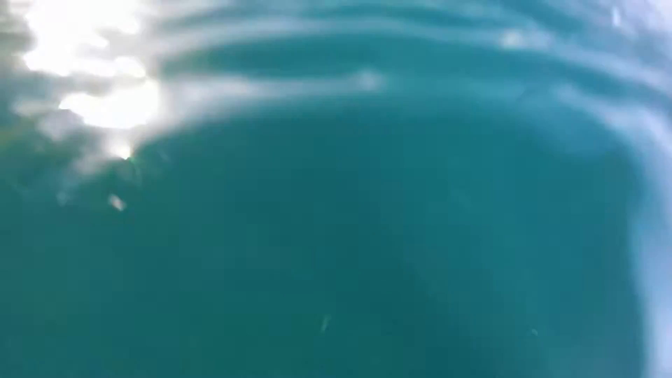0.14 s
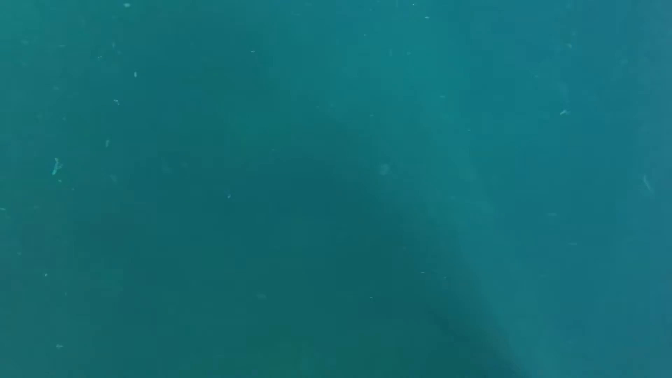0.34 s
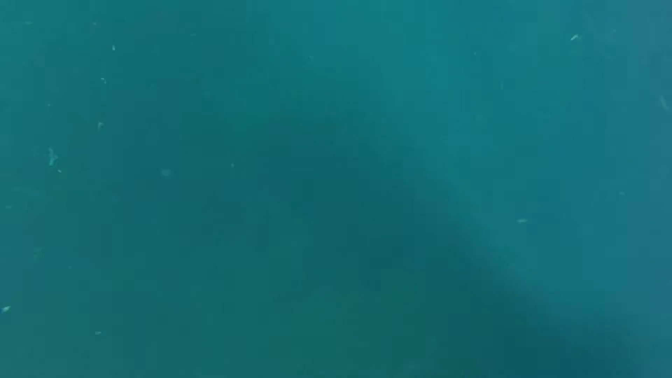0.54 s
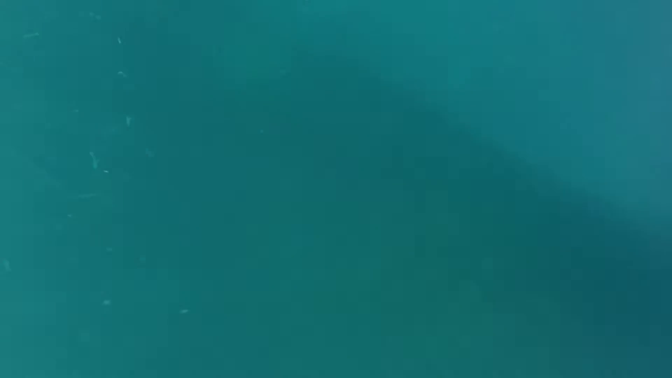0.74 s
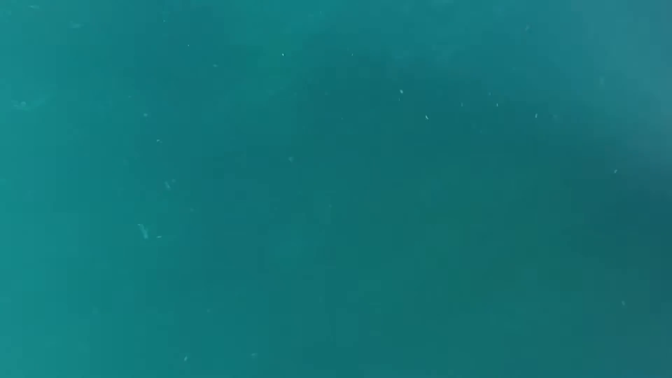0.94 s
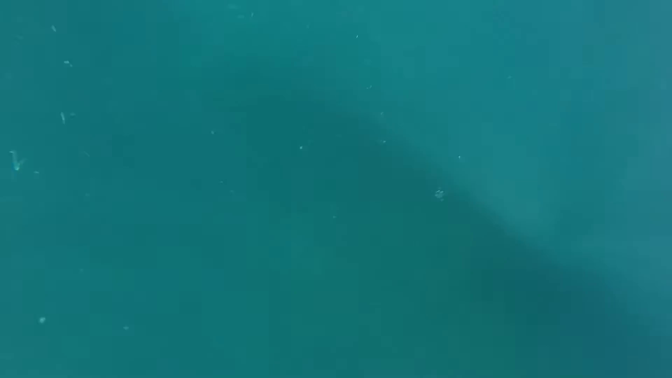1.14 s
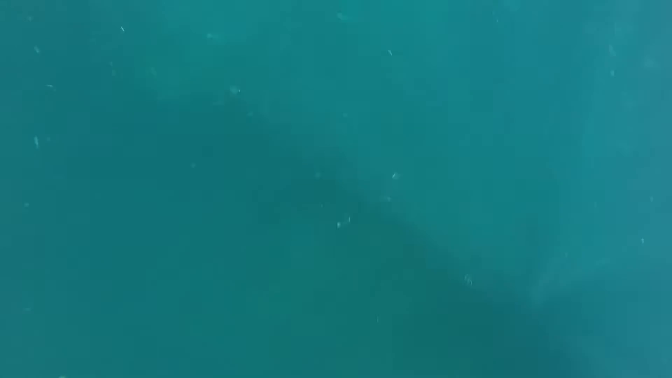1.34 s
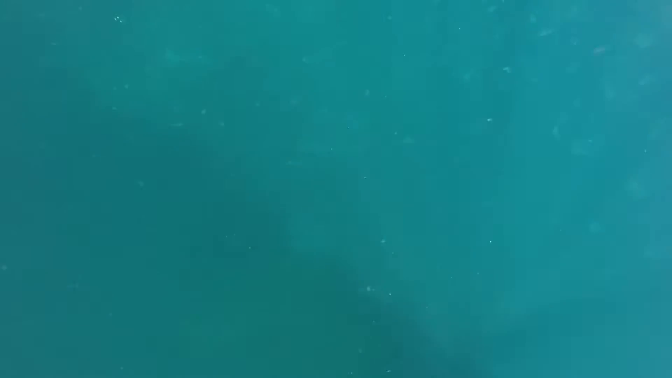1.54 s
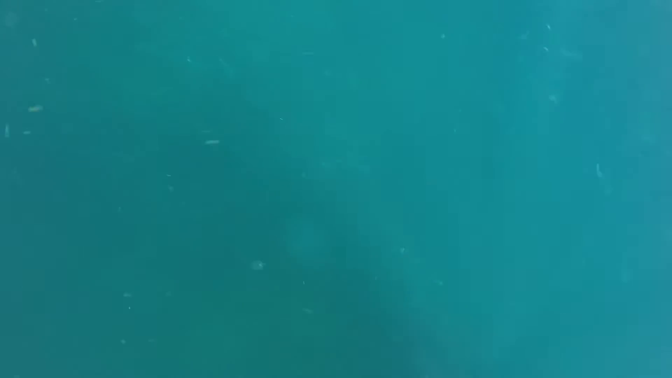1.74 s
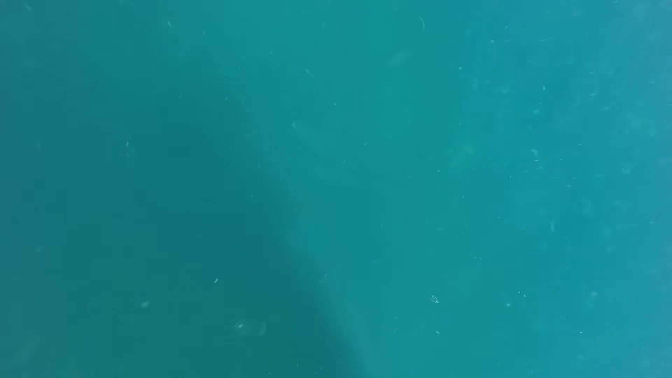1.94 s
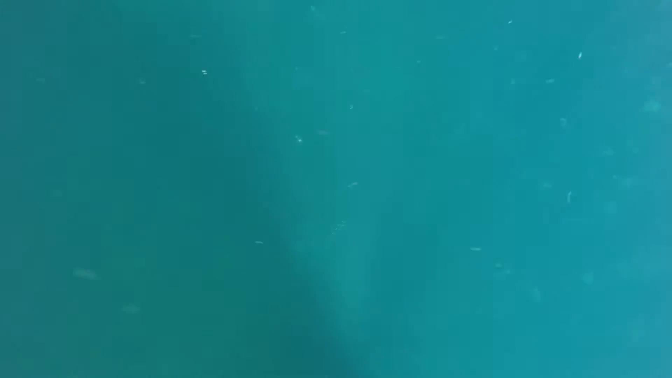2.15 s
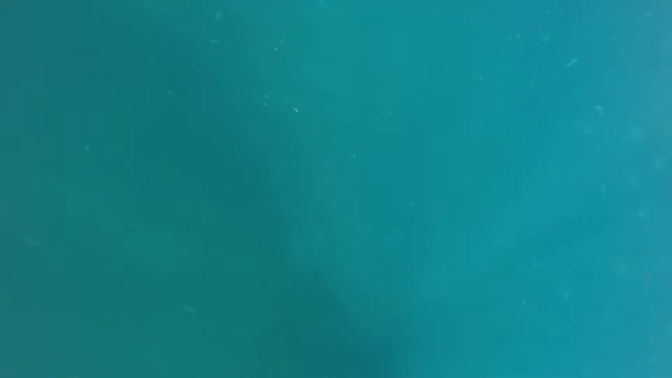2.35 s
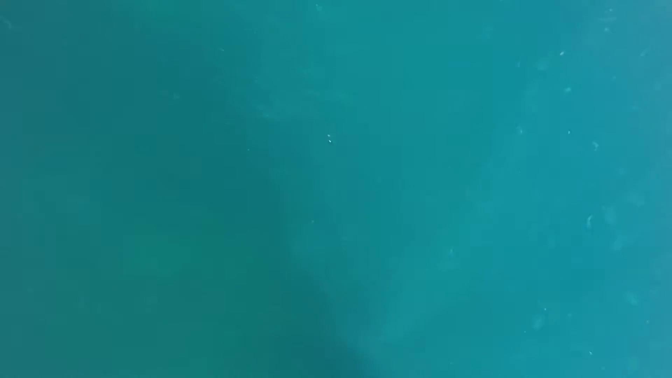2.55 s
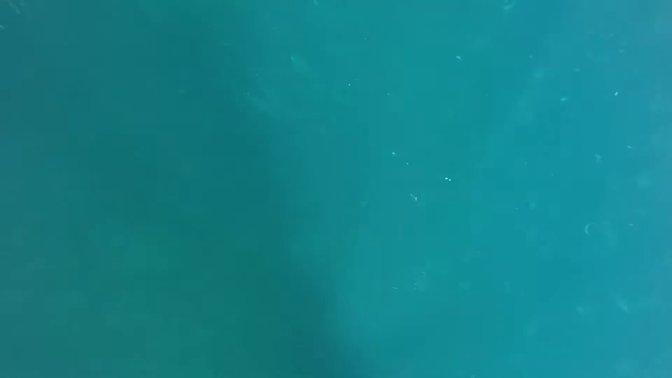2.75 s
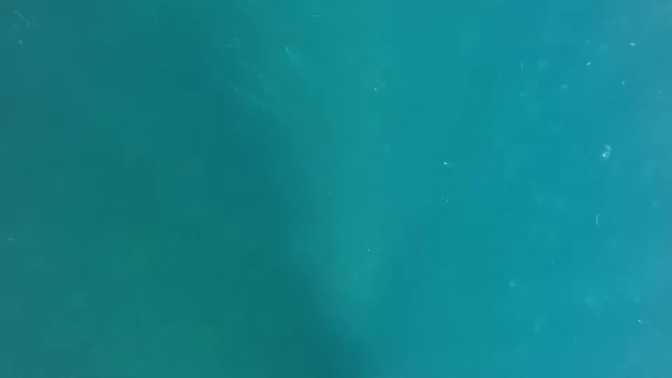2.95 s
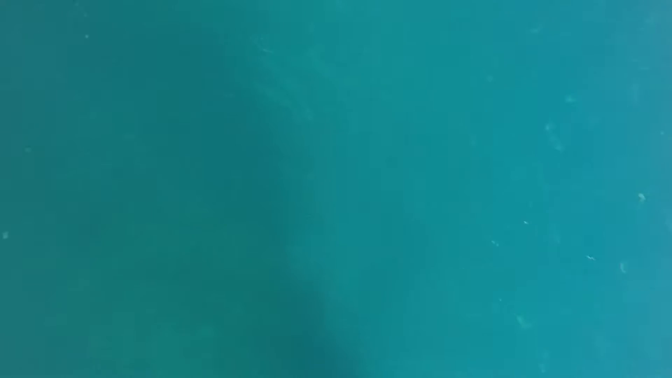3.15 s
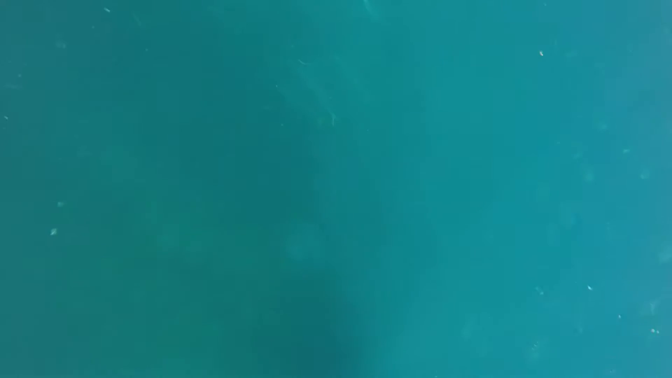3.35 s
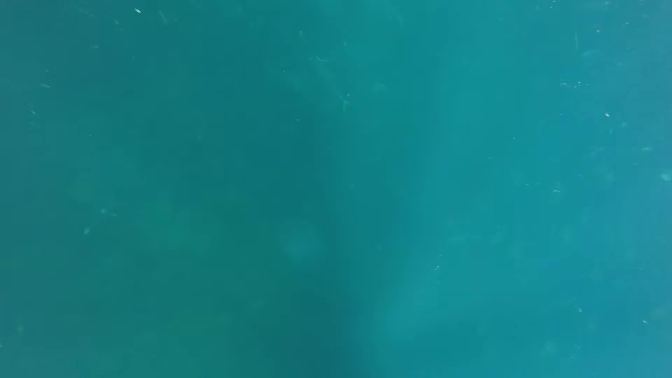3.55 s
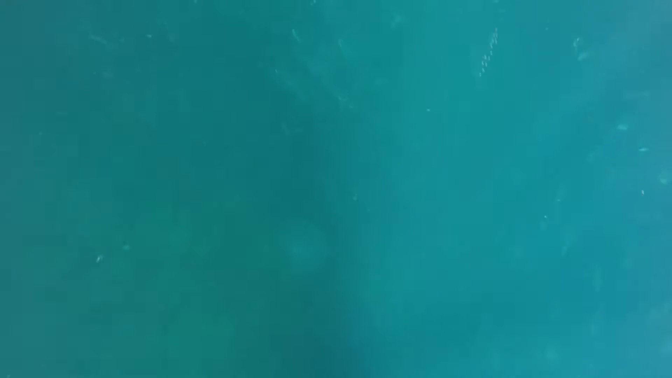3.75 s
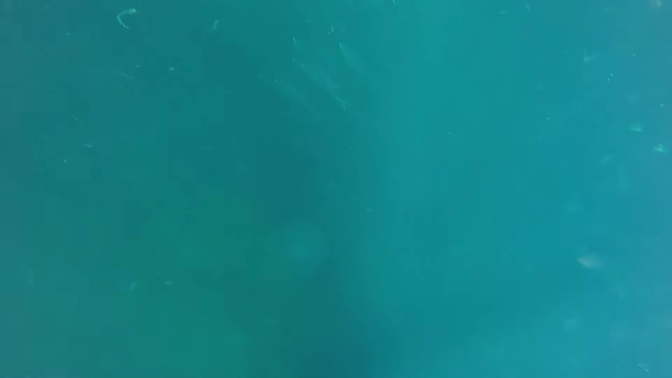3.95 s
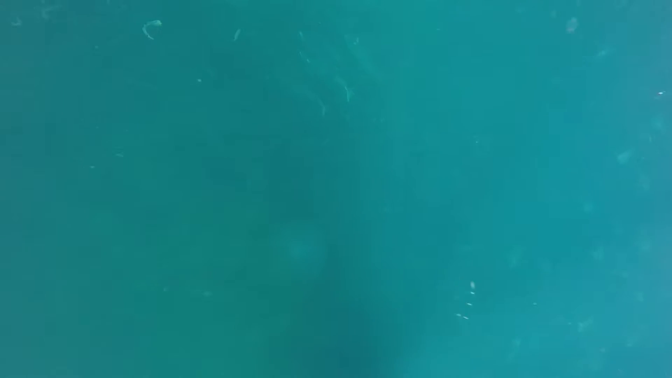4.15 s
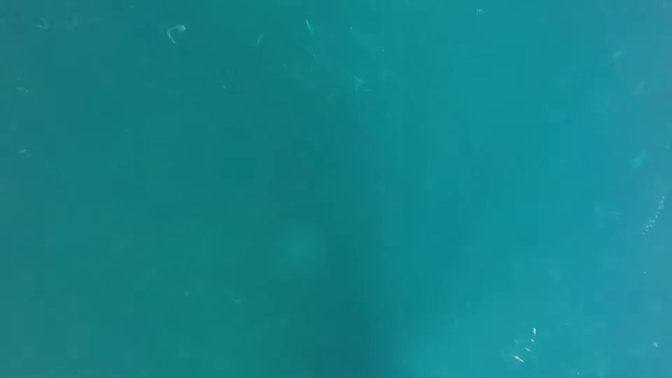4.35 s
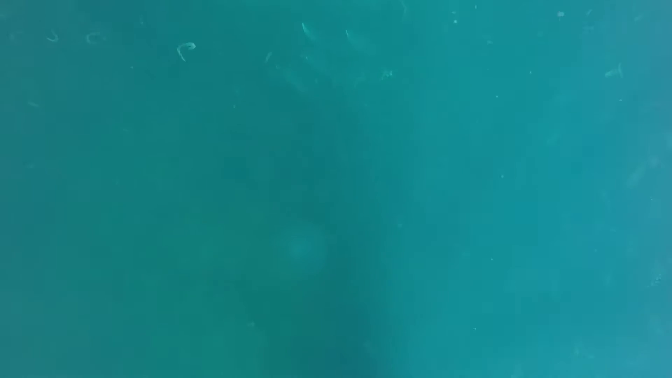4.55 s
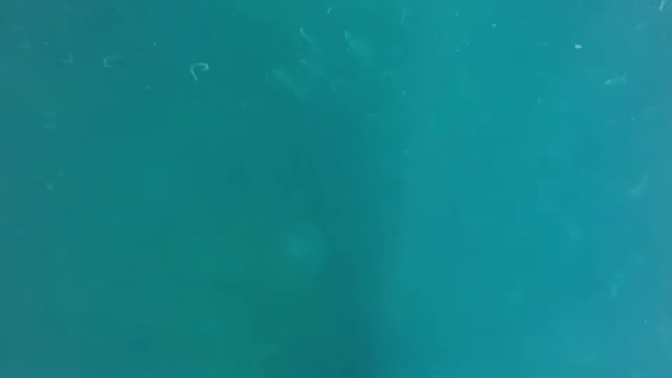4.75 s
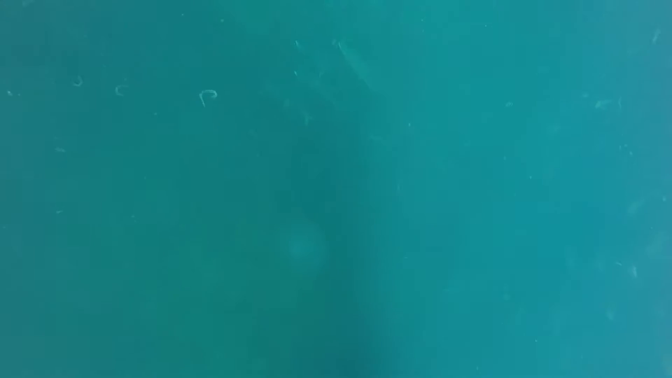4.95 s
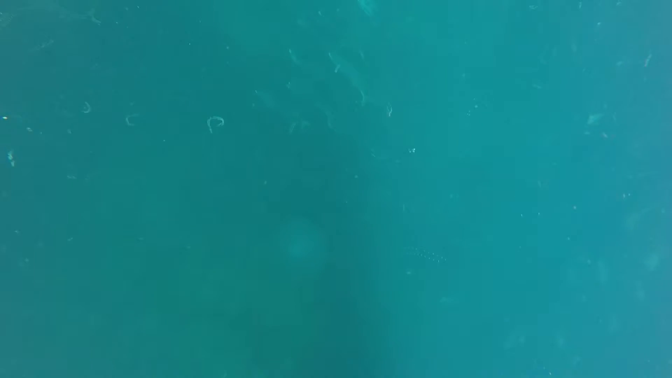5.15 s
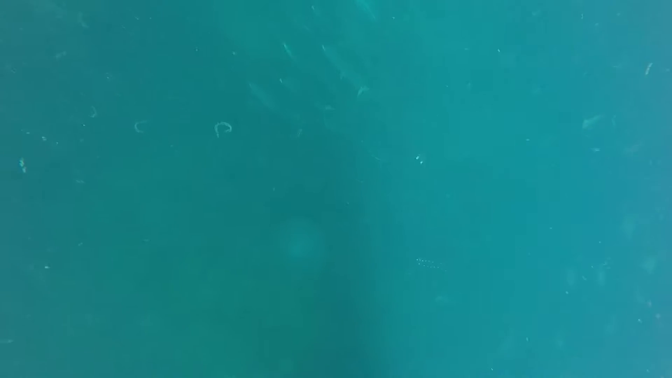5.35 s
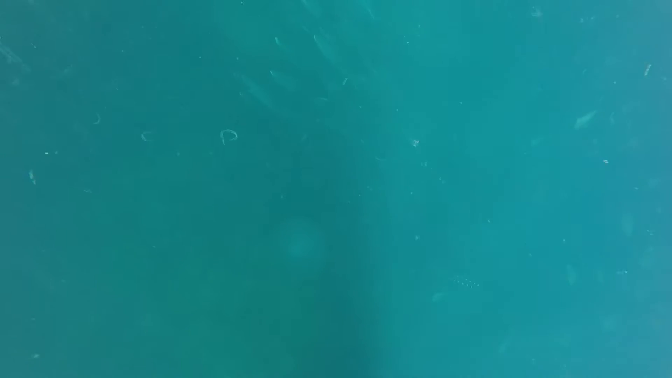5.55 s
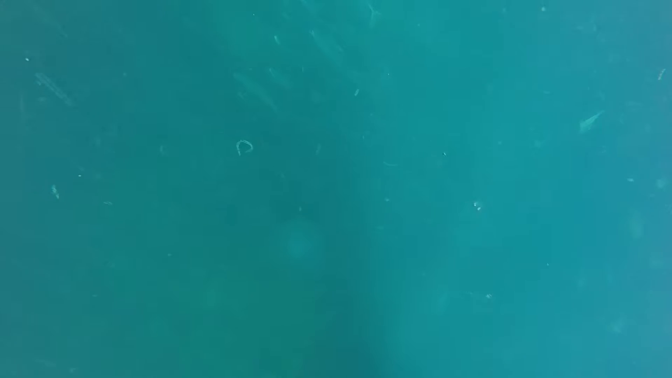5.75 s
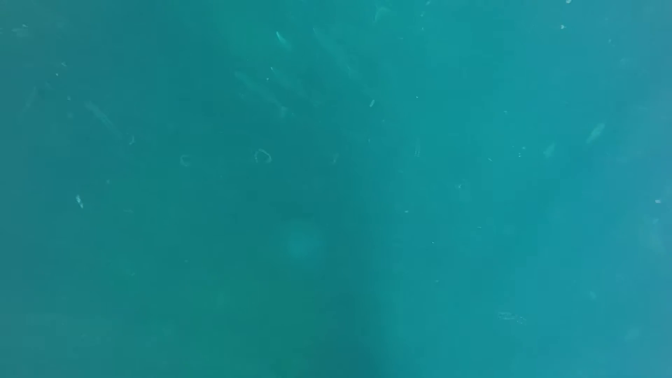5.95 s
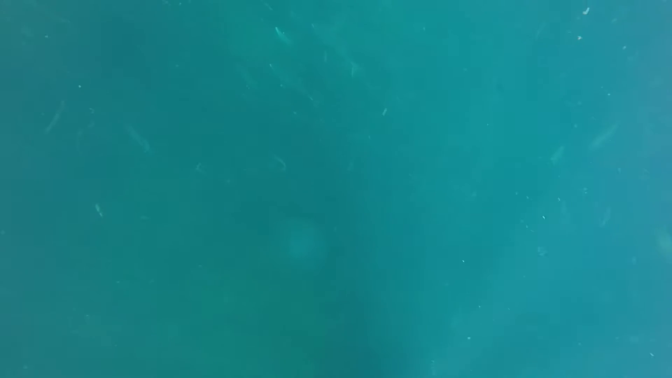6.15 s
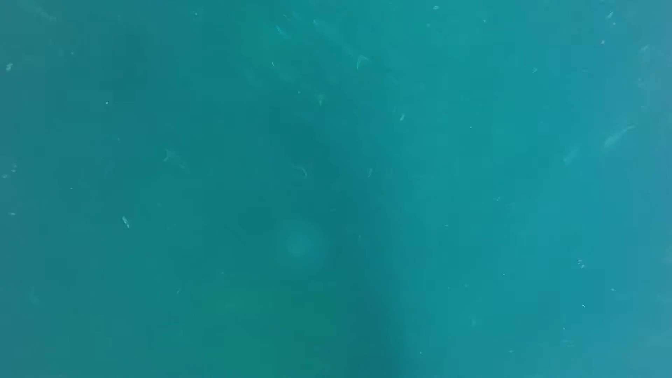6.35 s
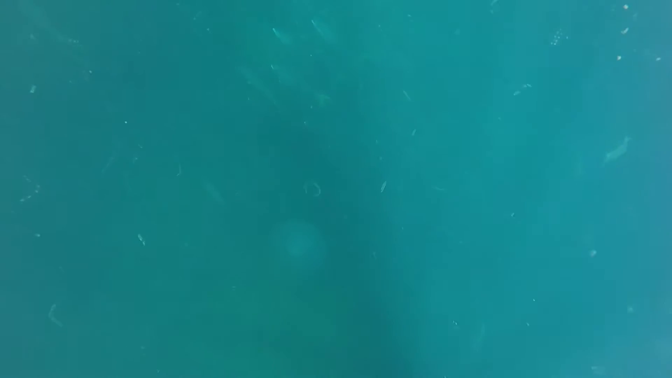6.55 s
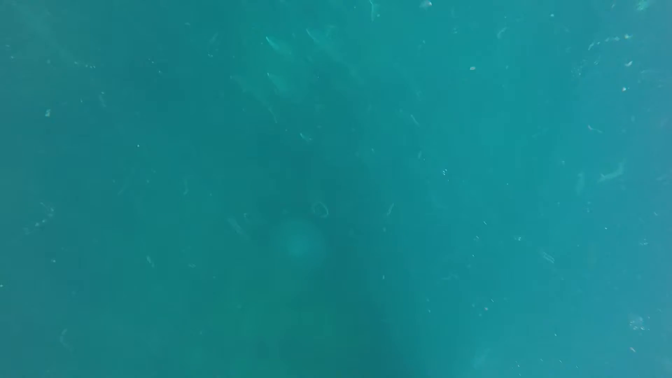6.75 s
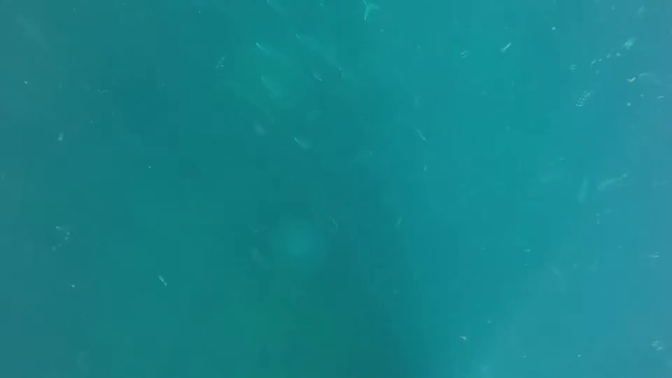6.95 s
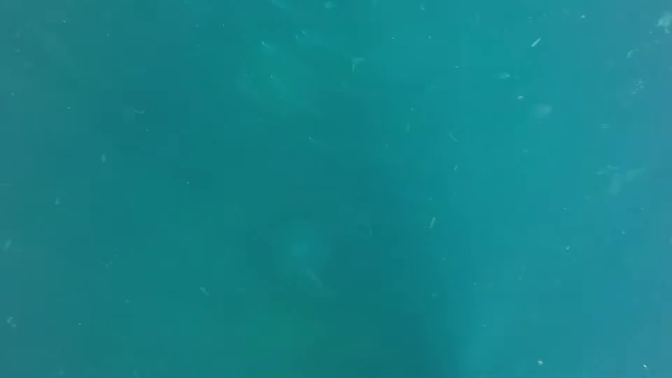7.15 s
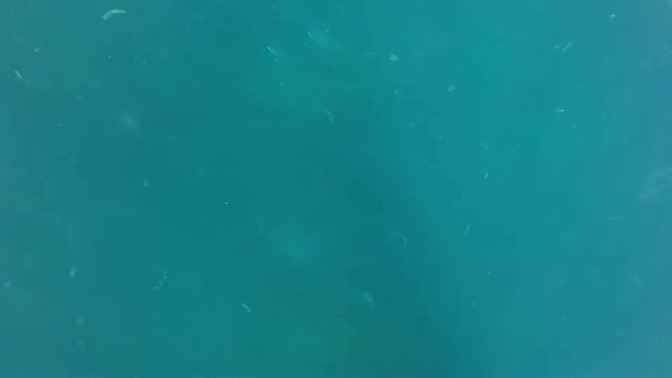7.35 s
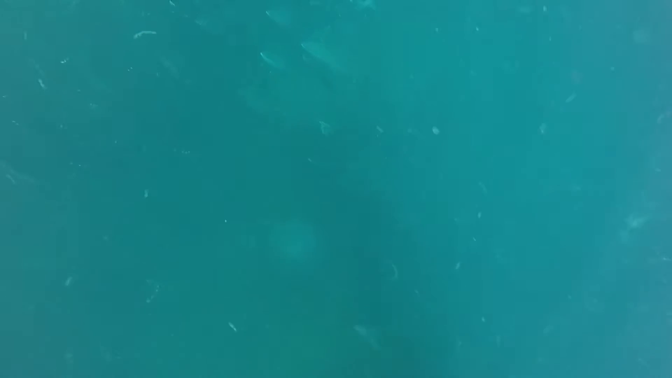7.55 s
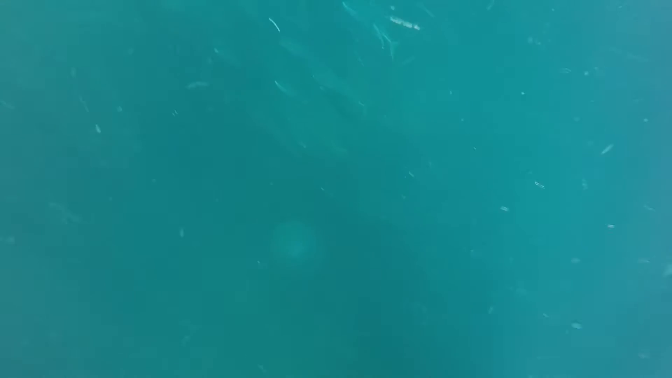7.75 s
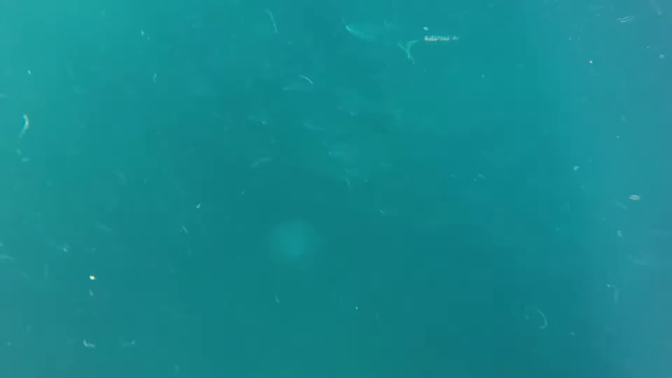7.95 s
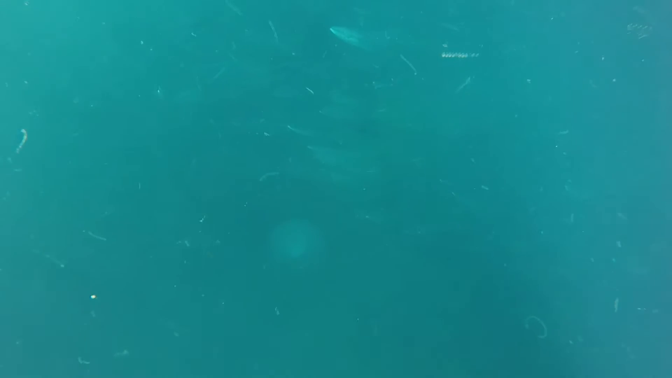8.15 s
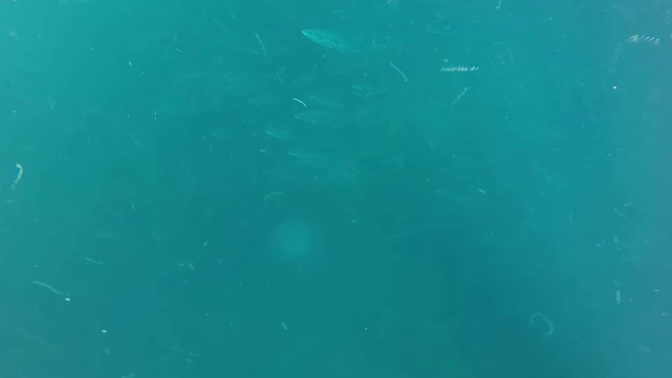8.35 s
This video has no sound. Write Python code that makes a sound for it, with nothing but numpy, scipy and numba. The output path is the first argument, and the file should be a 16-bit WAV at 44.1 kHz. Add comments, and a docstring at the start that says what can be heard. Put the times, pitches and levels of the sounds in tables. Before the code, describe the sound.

Sea water sloshes and bumps against a submerged shell, very close and boxy. Trapped air hums and knocks as bubbles burst free in irregular clusters. After a quieter gap, small bubbles leak one after another, around twelve a second, each a brief woody plop. Fine fizz and crackle lie beneath. The leak fades near seven and a half seconds, then water stirs and gurgles again.

```python
"""Water sloshes round a small camera in a sealed housing, just dipped under the sea, and thumps it.
Air pockets pop free and tick against the shell; then a steady string of bubbles leaks from one seam
over a low sway and a faint crackle. The water is filtered noise that swells with each surge.
Bubbles, thumps and knocks are short fading sine notes; cracks and snaps are puffs of noise.
Filters add the ringing of the shell and of the trapped air to many of these sounds."""
import sys
import numpy as np
from scipy import signal
from scipy.fft import rfft, irfft
from scipy.io import wavfile
from scipy.ndimage import uniform_filter1d
from numba import njit

SR = 44100
rng = np.random.default_rng(int(sys.argv[2]) if len(sys.argv) > 2 else 0)


def persist_wave(psi):
    """Save psi, clipped to +-1, as 16-bit WAV."""
    counts = np.round(np.clip(psi, -1, 1) * 32767).astype(np.int16)
    wavfile.write(sys.argv[1], SR, np.atleast_2d(counts).T)


N = 369999  # length in samples, about 8.4 s

# spectrum of the fizz of tiny bubbles: pitch_hz [Hz], level_db [dB per Hz]
FIZZ_SPECTRUM = [(2350, -8), (4000, -6.5), (4280, -5.5), (5280, -7), (5620, -5.5), (6160, -4.5), (7060, -7),
                 (8100, -4.5), (9370, -8.5), (11200, -19.5), (13000, -12), (15500, -34)]
AIR_HZ, AIR_WIDTH_HZ = 692.0, 66.0  # resonance of the air trapped in the housing


def undb(db):
    """Turns a level in dB into a gain."""
    return 10 ** (np.asarray(db) / 20)


def unit(x):
    """Scales a sound to an average (rms) level of 1."""
    return x / np.sqrt(np.mean(x ** 2))


@njit
def resonate(x, hz, width_hz):
    """A resonance: a state-variable band-pass filter with gain 1 at its centre."""
    y = np.empty(len(x))
    band, low = 0., 0.
    g = np.tan(np.pi * hz / SR)
    damping = width_hz / hz
    for i in range(len(x)):
        # the tiny offset keeps the filter from slowing down in silence
        v = (band + g * (x[i] + 1e-18 - low)) / (1 + g * (g + damping))
        band = 2 * v - band
        low += 2 * g * v
        y[i] = damping * v
    return y


@njit
def sing(rows, rise_turns):
    """Fading sines that build up over part of a turn; their pitch glides for 50 ms, then settles."""
    y = np.zeros(N)
    for start_s, gain, hz, glide, t60_s in rows:
        first = int(start_s * SR)
        turns = 0.
        for i in range(min(int(t60_s * SR), N - first)):
            t = i / SR
            turns += hz * 2 ** (glide * min(t, .05)) / SR
            fade = 1000 ** (-t / t60_s)  # 60 dB down after t60_s
            build_up = 1 - np.exp(-turns / rise_turns)
            y[first + i] -= gain * np.sin(2 * np.pi * turns) * fade * build_up
    return y


def ring(start_s, db, hz, glide, t60_s, rise_turns):
    """Plays fading sines from columns or single values; the glide is in octaves per second."""
    columns = np.broadcast_arrays(start_s, undb(db), hz, glide, np.maximum(t60_s, .002))
    return sing(np.stack(columns, axis=1).astype(float), max(rise_turns, .02))


def burst(start_s, db, decay_s, noise):
    """Short puffs of the given noise, each starting at once and dying away."""
    kick = np.zeros(N)
    kick[(start_s * SR).astype(int)] = undb(db)
    fade = np.exp(-np.arange(600) / (decay_s * SR))
    return signal.fftconvolve(kick, fade)[:N] * noise


def walk(rate):
    """A wandering level: random steps, rate a second, smoothed twice; its spread is near 1."""
    hold = int(SR / rate)
    steps = np.repeat(rng.standard_normal(N // hold + 1), hold)
    return 1.5 * uniform_filter1d(uniform_filter1d(steps, hold), hold)[:N]


def band_noise(hz, width_hz):
    """Noise through the same resonance twice, which leaves a narrow band at rms 1."""
    once = resonate(rng.standard_normal(N), hz, width_hz)
    return unit(resonate(once, hz, width_hz))


def grit(rate, spread_db):
    """Noise with sparse clicks of scattered size, on average rate a second."""
    size = undb(np.minimum(spread_db * rng.exponential(size=N), 15))
    struck = rng.random(N) < rate / SR
    return unit(rng.standard_normal(N) * (1 + 5.7 * size * struck))


def colour(x, points):
    """Gives a flat sound the spectrum drawn through points of pitch and level."""
    hz, db = np.transpose(points)
    bins_hz = np.arange(1, N // 2 + 2) * SR / N
    gain = undb(np.interp(np.log(bins_hz), np.log(hz), db))
    return irfft(rfft(x) * gain, N)


def shell(x):
    """The shell rings at its own resonances, added with alternating sign."""
    # resonances of the shell: pitch_hz [Hz], width_hz [Hz], level_db [dB]
    modes = [(863, 360, -7.5), (1364, 71, 1), (1790, 230, -6), (2175, 109, 1.5), (2650, 140, 2.5),
             (3514, 140, -5), (4117, 210, -13.5)]
    return sum((-1) ** k * undb(db) * resonate(x, float(hz), float(width_hz))
               for k, (hz, width_hz, db) in enumerate(modes))


def surge(t, column):
    """Gain of one layer as each surge swells quickly to its crest and drains away."""
    # surges of water against the housing, levels at the crest:
    # crest_s [s], sway_db [dB], slosh_db [dB], trapped_air_db [dB]
    surge_table = [(0.11, -50, -31.5, -60), (0.28, -31.5, -39, -65), (0.51, -31.5, -35.5, -72),
                   (0.82, -58, -43.5, -75), (1.141, -27.5, -35, -66), (1.54, -24.5, -25.5, -33.5),
                   (1.68, -39, -34, -44), (1.85, -22, -52, -45), (2.1, -24, -55, -35),
                   (2.6, -29, -40, -37.5), (2.67, -32, -34, -42), (2.87, -37.5, -43, -55),
                   (3.01, -46, -52, -42), (6.56, -46, -50, -60), (7.35, -42, -46, -58),
                   (7.64, -45, -42.5, -59), (7.83, -26, -35.5, -46.5), (7.93, -27, -27.5, -40)]
    rise_db_per_s, fall_db_per_s = 188, 144
    gain = 0
    for row in surge_table:
        below_crest_db = np.maximum(rise_db_per_s * (row[0] - t), fall_db_per_s * (t - row[0]))
        gain = gain + undb(row[column] - below_crest_db)
    return gain


def motion():
    """Gains of sway, slosh, trapped air, swirl and fizz: the calm water plus the surges."""
    # the water between surges:
    # time_s [s], sway_db [dB], slosh_db [dB], trapped_air_db [dB], swirl_db [dB], fizz_db [dB]
    calm_table = [(0.0, -44, -66, -82, -54.5, -75), (0.22, -43.5, -59, -75, -60.5, -69),
                  (0.7, -38, -46.5, -67.5, -58.5, -66.5), (1.35, -37, -54, -76, -57, -61),
                  (1.7, -50, -50.5, -57, -52, -59), (2.3, -38.5, -48.5, -46, -54.5, -62.5),
                  (2.5, -40.5, -55, -52.5, -53, -60.5), (3.099, -45.5, -56, -53, -54, -60),
                  (3.9, -50.5, -65.5, -54, -54, -59), (4.3, -52, -62, -55, -54, -61.5),
                  (5.6, -52, -62, -57, -54, -61), (7.1, -49, -61, -55, -55, -61.5),
                  (7.5, -43, -63, -47, -52, -59.5), (8.1, -38.5, -57, -57, -55, -60),
                  (8.39, -43, -54.5, -58, -54, -58)]
    t = np.arange(0, N + 64, 64) / SR  # every 64 samples is fine enough
    time_s, *calm_columns = np.transpose(calm_table)
    sway, slosh, air = surge(t, column=1), surge(t, column=2), surge(t, column=3)
    # a surge also stirs up grit and fizz, weaker than its trapped air
    stirred = [sway, slosh, air, air * undb(-22.5), air * undb(-25.5)]
    gains = []
    for calm_db, surging in zip(calm_columns, stirred):
        calm = undb(np.interp(t, time_s, calm_db))
        gains.append(np.interp(np.arange(N) / SR, t, np.hypot(calm, surging)))
    return gains


def swaying(gain):
    """Low noise of the swaying water; its deepest part swells less than the rest."""
    return gain * band_noise(55.0, 24.3) + undb(-20) * gain ** 0.59 * band_noise(28.3, 23.0)


def sloshing(gain):
    """Unsteady noise in three low bands as water sloshes round the housing."""
    unsteady = undb(5.2 * walk(25))
    noise = band_noise(186.3, 46.0) + undb(-5.5) * band_noise(269.0, 91.0)
    noise += undb(-20.5) * band_noise(408.0, 200.0)
    return gain * unsteady * noise


def trapped_air(gain):
    """Gritty jolts set the trapped air humming at its resonance."""
    jolts = grit(200, 4.5) * undb(2.95 * walk(40))
    hum = resonate(resonate(jolts, AIR_HZ, AIR_WIDTH_HZ), AIR_HZ, 300.0)
    return gain * (unit(hum) + undb(-9.5) * band_noise(722.0, 300.0))


def crackle(count=1500):
    """Tiny far bubbles of any high pitch, a few turns each."""
    when, pitch, size = rng.random((count, 3)).T
    hz = 2650.0 * 2 ** (2.4 * pitch)
    db = np.minimum(-4. * np.log(1 - size), 18)
    return unit(ring(when * N / SR, db, hz, 0., 2.6 / hz, 0.17))


def swirl_and_fizz(swirl_gain, fizz_gain):
    """Tiny bubbles strike in flurries, heard in the shell's ring and in part in the fizz."""
    flurry = walk(40)
    specks = grit(150, 3.2)
    swirl = undb(3.1 * flurry) * unit(shell(specks))
    hiss = undb(.7 * flurry) * rng.standard_normal(N)
    strikes = undb(3.0 * flurry) * (0.67 * specks + 1.13 * crackle())
    fizz = unit(colour(strikes + 1.46 * hiss, FIZZ_SPECTRUM))
    return swirl_gain * swirl + fizz_gain * fizz


def water():
    """Sway, slosh, humming trapped air, gritty swirl on the shell and fine fizz."""
    sway, slosh, air, swirl, fizz = motion()
    return swaying(sway) + sloshing(slosh) + trapped_air(air) + swirl_and_fizz(swirl, fizz)


def thumps():
    """Air pockets that swing, thump or chirp, each a fading sine with gliding pitch."""
    # start_s [s], level_db [dB, before build-up and fade], pitch_hz [Hz at the start],
    # rise [octaves per second], t60_s [s to fade by 60 dB]
    thump_table = [(0.093, -18, 65, 10.5, 0.26), (0.116, -11.5, 70.6, 0.5, 0.22),
                   (.3, -31, 574, -0.5, 0.18), (0.405, -22, 218, 3.5, 0.11), (.462, -33, 630, 43, 0.049),
                   (0.825, 1, 62.2, 6, 0.19), (0.828, -17.5, 203, 0.5, 0.19), (1.017, -15.5, 230, 3, 0.014),
                   (1.799, -7, 135.4, 12.5, 0.17), (2.047, -12.5, 51.3, 4, 0.16),
                   (2.05, -23.5, 178, 4.5, 0.14), (2.111, -28.5, 176, 2.5, 0.24),
                   (2.788, -7.5, 190.5, -3.5, 0.095), (2.789, -16, 281, 0, 0.13),
                   (2.927, -11, 188, -4, 0.078), (3.292, -20.5, 54, -10, 0.14),
                   (7.325, -33, 225, -16, 0.07), (7.565, -33.5, 220, 0, 0.082),
                   (7.679, -15.5, 53.7, -2.5, 0.37), (8.374, -10.5, 40.6, 14, 0.96)]
    return ring(*np.transpose(thump_table), 0.27)


def gushes(count=1300):
    """Crowds of short random bubbles, count a second, swelling fast and thinning out."""
    # start_s [s], length_s [s], level_db [dB, middle], pitch_hz [Hz, middle], spread [octaves]
    gush_table = [(0.082, 0.089, -39.5, 2010, 0.46), (0.247, 0.013, -34, 1460, 1.06),
                  (0.279, 0.036, -34.5, 2450, 0.36), (0.371, 0.098, -45, 1940, 0.56),
                  (0.449, 0.049, -45.5, 1600, 0.39), (0.509, 0.045, -49.5, 1270, 0.14),
                  (0.837, 0.048, -53, 1340, 0.33), (1.02, 0.013, -45, 1180, 0.14),
                  (1.105, 0.085, -43, 1420, 0.11), (1.279, 0.019, -37, 3100, 1.22),
                  (1.478, 0.069, -29, 1540, 0.76), (1.536, 0.029, -38, 1140, 0.85),
                  (1.608, 0.089, -39, 1270, 0.71), (1.803, 0.068, -40.5, 1180, 0.78),
                  (1.818, .055, -49.5, 2170, 0.23), (1.919, 0.029, -43, 1210, 0.3),
                  (1.973, 0.035, -46.5, 1220, 0.74), (2.039, 0.026, -48, 2310, 0.23),
                  (2.11, 0.06, -56, 1290, 0.61), (2.572, 0.13, -47, 1000, 0.93),
                  (2.867, 0.029, -54, 1280, 0.61), (3.28, 0.02, -41.5, 1710, 0.73),
                  (4.476, 0.089, -42, 2460, 0.53), (4.788, 0.066, -50.5, 2880, 0.46),
                  (4.9, 0.066, -43.5, 2660, 0.43), (7.329, 0.067, -52.5, 890, 0.45),
                  (7.562, 0.037, -52, 1290, 0.68), (7.658, 0.074, -44, 1200, 0.5),
                  (7.766, 0.027, -44, 1110, 0.4), (7.828, .13, -51, 1120, 1),
                  (8.329, 0.018, -40, 1280, 0.82), (8.379, 0.015, -29.5, 920, 0.6)]
    rows = []
    for start_s, length_s, db, hz, spread in gush_table:
        bubble_count = int(count * length_s) + 3
        when, up, down, size = rng.random((290, 4))[:bubble_count].T
        swell_db = 7.9 * np.log10(np.sin(np.pi * when ** 0.61) + 0.047)
        bubble_db = db + swell_db + 13.6 * (size - .5)
        bubble_hz = hz * 2 ** (2.21 * spread * (up - down))
        rows.append([start_s + length_s * when, bubble_db, bubble_hz])
    start_s, db, hz = np.concatenate(rows, axis=1)
    crowd = ring(start_s, db, hz, 8.1, 11.1 / hz, 0.17)
    air = resonate(crowd, AIR_HZ, AIR_WIDTH_HZ)
    return undb(-2.0) * crowd + undb(13) * shell(crowd) + undb(-1.0) * air


def string():
    """Each bubble leaking from the seam sings briefly and jolts it, never quite the same way twice."""
    # bubbles from the seam: time_s [s, 1 ms after the note starts], pitch_hz [Hz at the start]
    string_table = [(4.1863, 1283), (4.245, 1200), (4.321, 1440), (4.3954, 1380), (4.468, 1430),
                    (4.545, 1380), (4.628, 1360), (4.7086, 1356), (4.7863, 1280), (4.8667, 1240),
                    (4.9423, 1200), (5.0201, 1410), (5.1006, 1325), (5.192, 1370), (5.2798, 1306),
                    (5.375, 1355), (5.4611, 1330), (5.5504, 1320), (5.637, 1370), (5.7199, 1290),
                    (5.8107, 1230), (5.9042, 1340), (6.0018, 1385), (6.1068, 1320), (6.2234, 1350),
                    (6.3409, 1310), (6.4574, 1295), (6.5557, 1200), (6.6399, 1224), (6.7129, 1200),
                    (6.7852, 1280), (6.868, 1325), (6.9529, 1320), (7.0696, 1320), (7.2089, 1390),
                    (7.3554, 1420), (7.4785, 1450), (7.5664, 1510)]
    # what a bubble shakes besides itself, before scatter:
    # pitch_hz [Hz], level_db [dB against the bubble], t60_s [s to fade by 60 dB]
    seam_modes = [(192.2, -5, 0.064), (249, -6.5, 0.049), (799, -21.5, 0.086), (811, 0, 0.028),
                  (1100, -54, 0.036), (1359, -3.5, 0.046), (1660, -12, 0.034), (2040, -5.5, 0.0095),
                  (2640, -23, .012)]
    time_s, hz = np.transpose(string_table)
    start_s = time_s - .001
    db = -27 - 6.5 * np.log2(hz / 1340)  # bigger, deeper bubbles are louder
    db += -12 * np.maximum(time_s - 7.25, 0)  # the last bubbles come weaker
    vary = rng.standard_normal((len(time_s), 2, len(seam_modes)))
    out = ring(start_s, db, hz, 0.25, .028, 1.0)
    for k, (mode_hz, mode_db, t60_s) in enumerate(seam_modes):
        jolt_db = db + mode_db + 1.5 * vary[:, 0, k]
        jolt_hz = mode_hz * (1 + 0.04 * vary[:, 1, k])
        out += ring(start_s, jolt_db, jolt_hz, 0., t60_s, 0.53)
    return out - 0.7 * resonate(out, 467.0, 295.0)  # the seam is dead between its low and high modes


def knocks():
    """A sharp click on the shell, then the trapped air rings and shudders a few more times."""
    # time_s [s, just after the onset], level_db [dB of the first note alone, before build-up and fade],
    # pitch_hz [Hz]
    knock_table = [(0.292, -14, 535), (1.805, -17.5, 740), (1.902, -22, 720), (1.98, -17, 838),
                   (2.074, -18, 700), (2.105, -15, 732), (2.152, -26.5, 754), (2.273, -21.5, 700),
                   (2.568, -23, 722), (2.63, -25, 708), (2.786, -30, 780), (2.82, -29.5, 830),
                   (2.874, -30.5, 686), (2.93, -3, 748), (2.963, -30, 680), (3.112, -34, 690),
                   (3.2, -25, 696), (3.287, -27.5, 750), (3.389, -22, 680), (3.396, -22, 705),
                   (3.454, -31.5, 706), (3.647, -20.5, 684), (3.674, -23, 700), (3.977, -25.5, 712),
                   (4.452, -21, 690), (4.662, -20.5, 706), (4.891, -22, 695), (5.272, -21, 693),
                   (5.728, -21, 691), (6.314, -34.5, 700), (6.572, -21.5, 700), (7.354, -41, 740),
                   (7.478, -20, 730), (7.663, -30, 693), (7.702, -24, 697), (7.78, -28.5, 726),
                   (8.244, -33.5, 770), (8.339, -24, 740)]
    time_s, db, hz = np.transpose(knock_table)
    note = ring(time_s - .0012, db, hz, 0., 0.04, 0.9)
    late = rng.random((len(time_s), 3))
    for lag in late.T:  # later shudders are weaker
        note += ring(time_s + 0.0058 + 0.034 * lag, db - 5.0 - 14.0 * lag, hz, 0., 0.015, 0.56)
    # half of a knock's extra strength over a usual one (-24 dB) reaches its click
    click_db = -31 + 0.5 * (db + 24)
    click = ring(time_s - .0015, click_db, 2216.0, 0., 0.012, 0.6)
    click += ring(time_s - .0015, click_db - 8, 1350.0, 0., 0.036, 0.6)
    air = undb(-5.0) * resonate(note, AIR_HZ, AIR_WIDTH_HZ)
    return note + air + click + undb(3) * shell(click)


def bubbles():
    """Mid-sized bubbles of the first seconds, rising a little in pitch."""
    # start_s [s], level_db [dB, before build-up and fade], pitch_hz [Hz at the start]
    bubble_table = [(0.0657, -20, 1310), (0.2544, -16, 1524), (0.292, -22, 1950), (0.319, -25, 1340),
                    (0.3486, -28.5, 1490), (0.3805, -37, 1500), (0.395, -22, 1470), (0.4572, -18.5, 1880),
                    (0.467, -32, 2220), (0.487, -29, 1530), (0.712, -30.5, 1820), (0.7572, -29, 1940),
                    (0.8371, -27.5, 1326), (1.177, -11, 1534), (1.255, -36, 1050), (1.3149, -31, 1290),
                    (1.517, -24, 1320), (1.6213, -24, 1360), (1.6508, -14.5, 1560), (1.801, -28, 1210),
                    (1.9048, -16.5, 1270), (1.9774, -24.5, 1000), (2.0759, -10.5, 1347),
                    (2.104, -10.5, 1480), (2.275, -35.5, 1780), (2.9284, -25, 1040), (3.2176, -28, 1430),
                    (3.396, -36, 1790), (3.645, -31, 1780)]
    start_s, db, hz = np.transpose(bubble_table)
    return ring(start_s, db, hz, 2.3, 0.031, 0.32)


def faint_ticks(count=26):
    """Columns like those of the tick table, for faint ticks scattered at random."""
    when, size, pitch, crack, snap = rng.random((count, 5)).T - .5
    start_s = (when + .5) * (N / SR - .05)
    return [start_s, -35 + 6 * size, 2410 * 2 ** (.4 * pitch), -13.5 + 16 * crack, -18 + 18 * snap]


def ticks():
    """Small bubbles: short high notes, each with a crack that rings the shell and a snap on top."""
    # start_s [s], level_db [dB, before build-up and fade], pitch_hz [Hz at the start],
    # crack_db [dB against the note], snap_db [treble snap, dB against the note]
    tick_table = [(0.0665, -22.5, 2400, -41, -44), (0.256, -19.5, 2320, -6, -15.5),
                  (0.2914, -4, 2680, -6, -34), (0.317, -15, 2730, -9, -23), (0.3314, -11.5, 2550, -34, -41),
                  (0.395, -31, 4750, -15, -5), (0.415, -22.5, 3200, -7, -22),
                  (0.4556, -2, 2720, -11.5, -61), (0.512, -30, 2750, -25, -8.5),
                  (0.7147, -13.5, 2770, -11.5, -38), (0.7572, -27.5, 2000, -35, -24),
                  (0.8383, -28.5, 2560, -37, -24), (1.1573, -28, 2570, -27, -9.5),
                  (1.1741, -13.5, 2030, -49, -35), (1.2202, -22.5, 3390, -6, -11.5),
                  (1.283, -22, 12900, -13, -6), (1.292, -20, 2330, -16, -2), (1.3146, -17, 2560, -4, -32),
                  (1.346, -28.5, 2750, -5, -19), (1.4347, -28, 3920, -7, -30),
                  (1.4901, -13, 3140, -37, -37), (1.518, -36, 6160, -17, -13),
                  (1.5617, -23.5, 5600, -10, -26), (1.6523, -13, 2110, -32, -37),
                  (1.666, -34, 3720, -10, -1), (1.7, -39, 3860, -8, -10), (2.036, -29.5, 2360, -32, -32),
                  (2.0735, -17.5, 1960, -41, -35), (2.1061, -16, 3120, -24, -32),
                  (2.147, -24, 1950, -20, -18.5), (2.476, -23, 2590, -17, -11.5),
                  (2.5221, -28, 2620, -6.5, -12), (3.218, -28, 2500, -35, -34),
                  (3.3947, -26, 2280, -21, -20), (3.4568, -29, 2530, -24, -17),
                  (3.482, -28.5, 2600, -7, -9.5), (3.56, -30, 2540, -25, -29),
                  (3.5965, -30.5, 2670, -26, -7.5), (3.646, -28.5, 2620, -13, -12),
                  (3.7387, -22, 2580, -17, -41), (3.9788, -30, 2670, -16, -16),
                  (4.4817, -9, 2240, -38, -19.5), (4.498, -20, 2600, -25, -25),
                  (4.79, -29.5, 2560, -10, -31), (4.911, -28, 2500, -15, -17.5),
                  (5.2088, -25.5, 2590, -15.5, -20), (5.272, -32, 2540, -12, -37),
                  (5.3995, -30.5, 2680, -16, -26), (5.449, -28.5, 2300, -15, -20),
                  (5.505, -33.5, 2760, -8, -33), (5.6803, -32, 2550, -5, -8), (5.9487, -28, 2500, 0, -40),
                  (6.062, -25.5, 2650, -28, -14.5), (6.4537, -33.5, 2110, -1.5, -2.5),
                  (6.5932, -31, 2570, -5.5, -31), (7.2067, -40.5, 2620, -6, -1.5),
                  (7.629, -28, 2520, -36, -25), (7.7447, -34, 2700, -23, -8.5),
                  (7.9091, -20, 2510, -8, -17), (8.1341, -19.5, 2610, -17.5, -24),
                  (8.335, -25, 2110, -35, -41)]
    columns = np.concatenate([np.transpose(tick_table), faint_ticks()], axis=1)
    start_s, db, hz, crack_db, snap_db = columns
    note = ring(start_s, db, hz, 4.0, 0.013, 0.24)
    crack = burst(start_s, db + crack_db, 0.0014, band_noise(3620.0, 2030.0))
    treble = unit(colour(band_noise(7360.0, 6600.0), FIZZ_SPECTRUM))
    snap = burst(start_s, db + snap_db, 0.0016, treble)
    return note + undb(8.0) * shell(crack) + crack + snap


def scene():
    """Everything reaches one microphone inside the housing."""
    mix = water() + thumps() + gushes() + string() + knocks() + bubbles() + ticks()
    return mix[None]


def record(dry):
    """The recorder cuts the top: a steep low-pass filter at 15680 Hz."""
    low_pass = signal.ellip(8, .2, 70, 15680, fs=SR, output="sos")
    return signal.sosfilt(low_pass, dry)


dry = scene()
out = record(dry)
persist_wave(out)
```